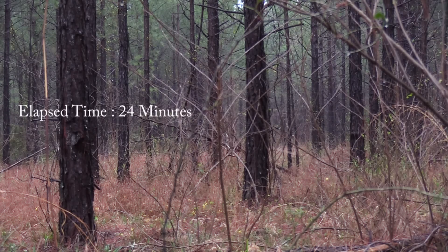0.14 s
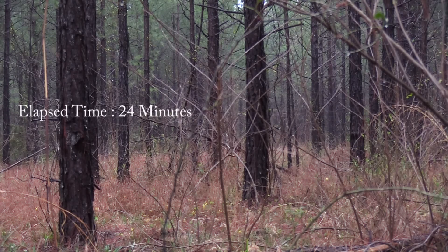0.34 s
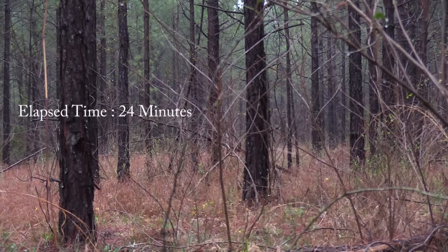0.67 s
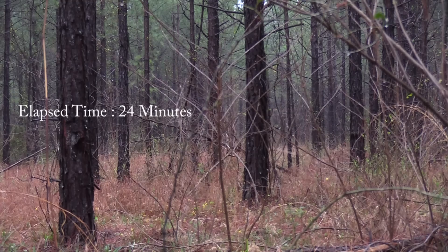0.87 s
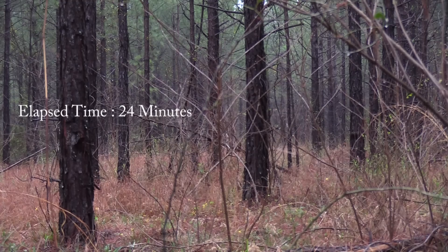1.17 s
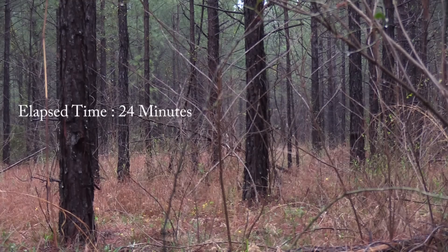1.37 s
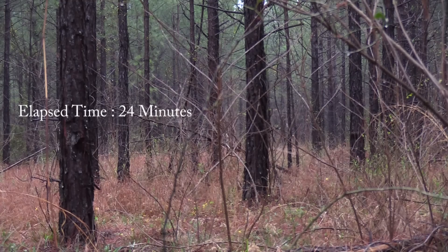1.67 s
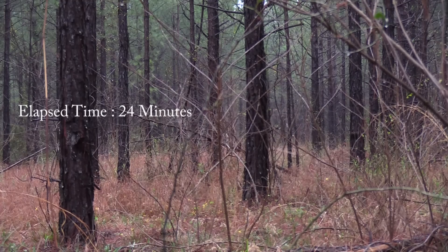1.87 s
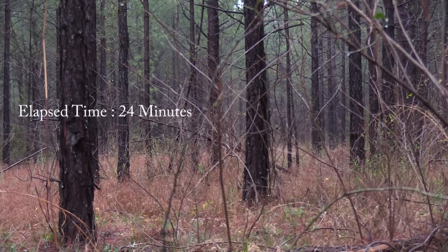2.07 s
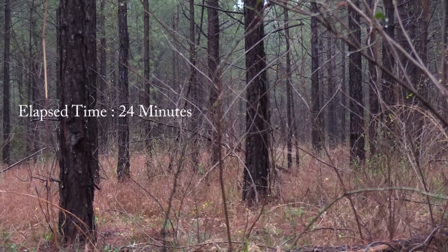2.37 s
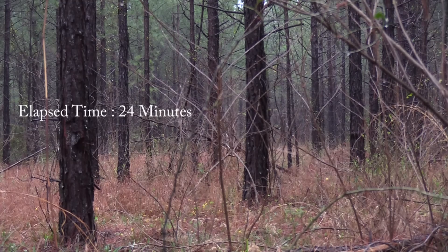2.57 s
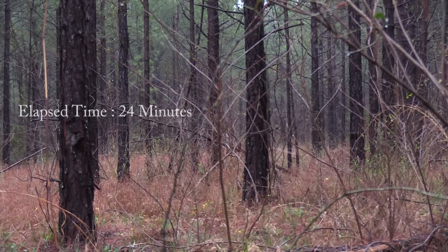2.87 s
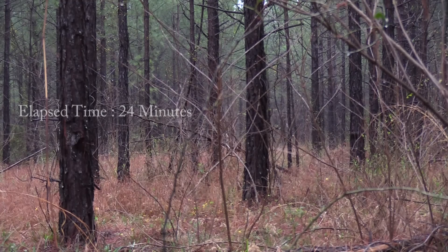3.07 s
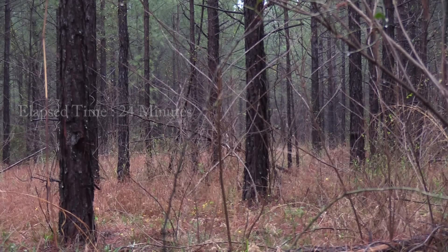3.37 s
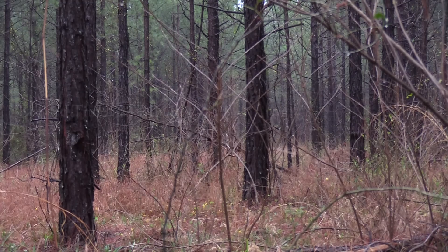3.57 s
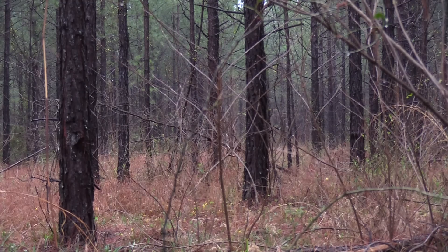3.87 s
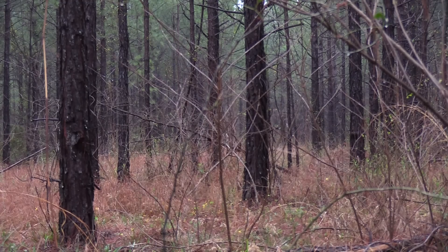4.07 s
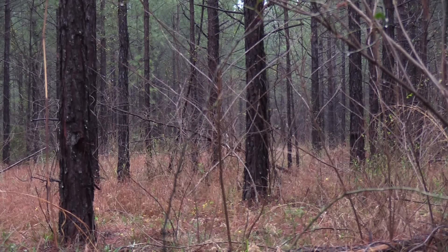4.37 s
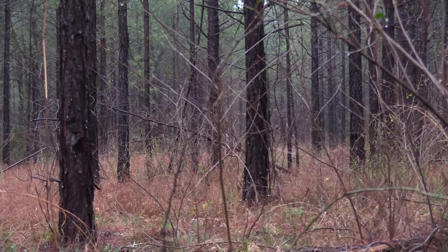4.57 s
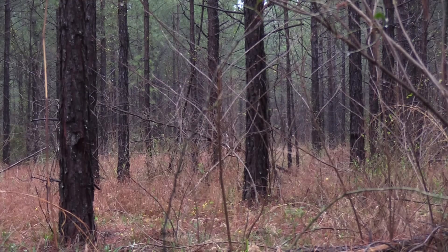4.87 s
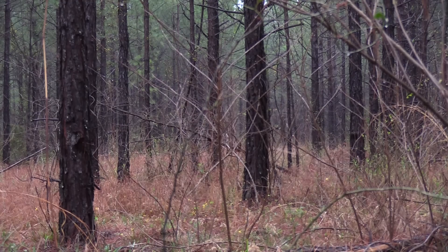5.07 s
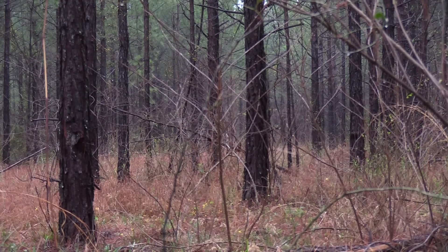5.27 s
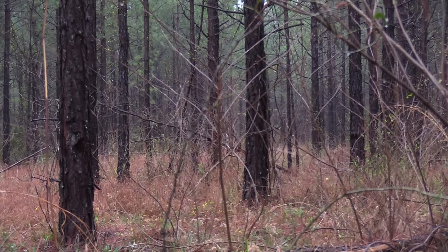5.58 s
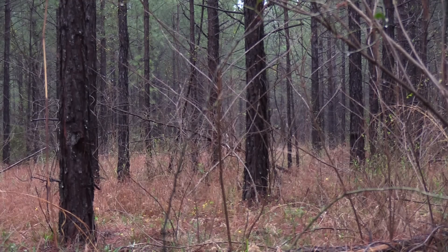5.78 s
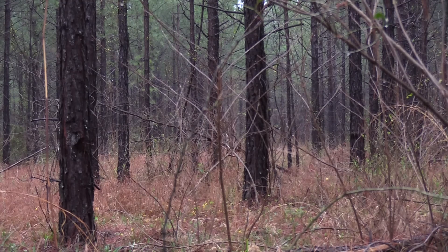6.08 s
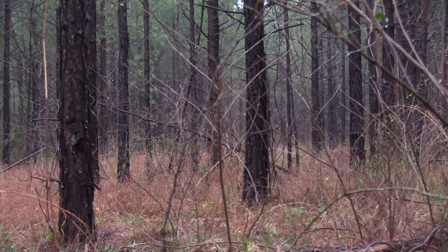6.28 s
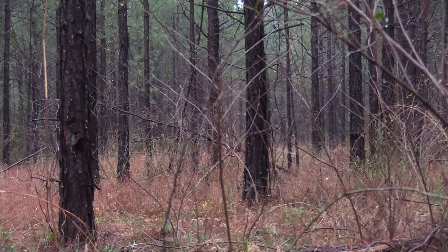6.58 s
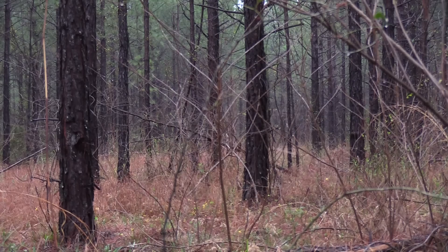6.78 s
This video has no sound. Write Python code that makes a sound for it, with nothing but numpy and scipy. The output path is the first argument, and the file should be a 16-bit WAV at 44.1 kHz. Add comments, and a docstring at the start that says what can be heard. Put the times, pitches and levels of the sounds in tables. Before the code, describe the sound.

A seven-second stereo ambience in still pine woods, with hand-held camera noise close by. A steady motor hum near 120 hertz, low rumble and thin wide hiss run throughout. From 0.5 seconds, soft deep double thumps through the grip repeat every two thirds of a second. A faint far bird gives a hoarse, noisy call gliding up toward 3.3 kilohertz, strongest around 0.4 to 0.9 and fading soon after. Dry twig ticks come at 1.3 and 1.8; faint thin calls at 2.4 and 3.4. At 4.3 a turkey makes one deep chest pulse, with small scuffs. From 4.6 its pulses near 65 hertz quicken from about twelve to nearly forty per second, merging into a throbbing boom ending around 6.2. Light rustle grows from 4.4, with tiny high squeaks from 4.9 to 6.4 and a low pressure shift near 5.7 to 6.1. Hum, rumble and softer rustle remain.

```python
"""Turkey drumming in pine woods

A wild turkey drums in still pine woods: after one short pulse, quickening chest pulses boom near 65 Hz,
made of overtones passing through a fixed resonance. A far bird gives a hoarse rising call, a gliding
noise-torn tone; two faint far calls (blurred sines) and dry twig ticks follow. A hand-held camera adds
motor hum (sines), rumble and hiss (shaped noise), a slow thump through the grip (struck resonances), and,
as it turns, faint squeaks (blurred sines) and rustle (noise).
"""
import sys
import numpy as np
from scipy import signal
from scipy.fft import rfft, irfft
from scipy.io import wavfile
from scipy.ndimage import uniform_filter1d

SR = 44100
rng = np.random.default_rng(int(sys.argv[2]) if len(sys.argv) > 2 else 0)


def digitize_waveform(pressure):
    """Quantize a signal to 16-bit integers and store it at the path in sys.argv[1].

    Rows of a 2-D input are taken as channels; values are limited to [-1, 1].
    """
    field = np.atleast_2d(pressure).T
    bounded = np.clip(field, -1, 1)
    quanta = np.round(bounded * 32767).astype(np.int16)
    wavfile.write(sys.argv[1], SR, quanta)


def ratio_of_db(decibels):
    """Turn decibels (scalar or array-like) into linear amplitude factors; 0 dB maps to 1."""
    return 10 ** (np.asarray(decibels, float) / 20)


N = 306230
TIME = np.arange(N) / SR

# The drum roll: (time [s], pulse rate [1/s], boom level [dB rms])
DRUM_ROLL = [(4.6, 12.2, -54), (4.66, 12.7, -38), (4.77, 13.8, -30), (4.92, 15, -30), (5.1, 17.2, -27),
             (5.2, 18, -32), (5.35, 21, -28.5), (5.5, 23.2, -28), (5.7, 24.7, -37.5), (5.8, 26.9, -32),
             (5.92, 29.5, -32.5), (6.1, 37, -25), (6.17, 33.6, -36), (6.25, 44, -60)]
# Strength of each thump through the grip, evenly paced: (level [dB])
THUMP_STRENGTHS = [-27.5, -30, -29, -26, -30, -41, -31, -29, -30.5, -28]
# Resonances of the held camera: (frequency [Hz], level [dB], t60 [s], delay [s])
GRIP_MODES = [(30.1, -0.5, 0.78, 0.0038), (10.4, -10, 1.9, 0.043)]
# Faint thin notes: two soft far calls near 1.9 and 1.3 kHz, then short squeaks:
# (time [s], length [s], start pitch [Hz], end pitch [Hz], level [dB rms])
THIN_NOTES = [(2.445, 0.24, 1905, 1876, -69.5), (3.38, 0.27, 1340, 1344, -69),
              (4.856, 0.13, 1950, 1970, -65), (4.87, 0.26, 2160, 2140, -68.5),
              (5.182, .28, 2450, 2320, -61.5), (5.202, 0.3, 3200, 3060, -62),
              (5.211, 0.046, 4900, 4810, -64), (5.29, .08, 5530, 5500, -66), (5.52, 0.096, 2160, 2170, -66),
              (5.67, .05, 2147, 2150, -65), (5.863, 0.0565, 2970, 2670, -57),
              (5.925, 0.032, 2990, 2960, -61), (6.07, .06, 3030, 2850, -57), (6.06, .16, 2620, 2580, -64),
              (6.08, 0.17, 3477, 3465, -65.5), (6.385, 0.032, 2800, 2800, -64)]
# Pitchless scuffs: (time [s], length [s], centre [Hz], level [dB rms], blur [Hz])
SCUFF_NOTES = [(4.227, 0.026, 2500, -58, 350), (4.228, .03, 4900, -63, 350), (4.27, .03, 2610, -65, 150),
               (4.53, .07, 2210, -62, 250), (6.5, 0.42, 4850, -67, 600)]
# Dry twig ticks: (time [s], frequency [Hz], starting level [dB])
TWIG_TICKS = [(1.345, 1600, -37), (1.81, 2300, -46)]
# Rustle while the camera turns: (time [s], bright hiss level [dB], duller rub level [dB])
RUSTLE_LEVELS = [(4.1, -77, -80), (4.36, -75, -76), (4.42, -64, -71), (4.62, -64, -70), (4.72, -56.5, -62),
                 (4.9, -61.5, -62), (5.4, -62.5, -61.5), (6.1, -62, -61.5), (6.5, -68, -65),
                 (6.94, -67, -69)]
# Steady motor tones: (frequency [Hz], level [dB rms], pitch waver [Hz])
MOTOR_TONES = [(119.8, -34.5, 0.31), (202.9, -48.5, 0.86), (238.8, -46, .3), (343.6, -56.5, 5.03),
               (503.8, -65.5, 1.16)]
# Rumble and hiss common to both microphone ports: (frequency [Hz], density [dB per Hz])
RUMBLE_SPECTRUM = [(8, -50.5), (20, -59.5), (45, -59.5), (80, -60.5), (105, -56.5), (140, -57.5),
                   (160, -64.5), (200, -62.5), (225, -68.5), (270, -62.5), (315, -77), (345, -68.5),
                   (390, -81), (480, -83), (680, -78), (850, -88.5), (1300, -90.5), (2000, -95.5),
                   (4000, -97.5), (8000, -99), (13000, -100), (15500, -105)]
# Hiss of opposite sign at the two ports: (frequency [Hz], density [dB per Hz])
HISS_SPECTRUM = [(20, -100), (60, -108), (150, -112), (300, -100), (500, -95.5), (1000, -99), (2000, -101),
                 (4000, -100), (8000, -101), (13000, -101), (15500, -105)]


def coloured(spectrum):
    """White noise shaped to a spectrum in dB per Hz, falling steeply below its first frequency."""
    hz, db = np.transpose(spectrum)
    bins = np.maximum(np.fft.rfftfreq(N, 1 / SR), 1)
    gain = ratio_of_db(np.interp(np.log(bins), np.log(hz), db))
    gain = gain * np.minimum(bins / hz[0], 1) ** 4
    return irfft(rfft(rng.standard_normal(N)) * gain, N) * np.sqrt(SR / 2)


def drift(hz, size):
    """Slow random motion: noise twice through a one-pole low-pass, with a spread of 1."""
    r = np.exp(-2 * np.pi * hz / SR)
    slow = signal.lfilter([1], [1, -2 * r, r * r], rng.standard_normal(size + SR))[SR:]
    return slow / np.sqrt((1 + r * r) / (1 - r * r) ** 3)


def drum():
    """The pulse train quickens, so ever lower overtones climb through the fixed chest resonance."""
    chest_hz, below_width_hz, above_width_hz = 69.5, 12.5, 6.5
    first_s, first_db, first_width_s = 4.265, -32.5, 0.055
    s, per_s, boom_db = np.transpose(DRUM_ROLL)
    rate = np.interp(TIME, s, per_s)
    turns = np.cumsum(rate) / SR
    turns = turns - turns[int(first_s * SR)]  # the lone first pulse falls on its level peak
    order = np.arange(1, 9)[:, None]
    off = order * rate - chest_hz
    width = np.where(off > 0, above_width_hz, below_width_hz)  # steeper above than below
    chest = np.exp(-(off / width) ** 2)
    boom = (chest * np.cos(2 * np.pi * order * turns)).sum(axis=0)
    evened = boom / np.sqrt((chest ** 2).sum(axis=0) / 2)
    first = ratio_of_db(first_db) * np.exp(-((TIME - first_s) / first_width_s) ** 2)
    roll = ratio_of_db(np.interp(TIME, s, boom_db, left=-120, right=-120))
    return (first + roll) * evened


def call():
    """A gliding tone and its lower octave, both torn into a narrow noise by an unsteady throat."""
    top_hz, top_s, arch_hz_per_s2 = 3355, 1.1, 400
    width_hz, lower_db = 154, -9.5
    full_db, full_s, fades_s = -56.5, 0.43, 0.87
    swell_db_per_s, fade_db_per_s = 20, 33
    pitch = np.maximum(top_hz - arch_hz_per_s2 * (TIME - top_s) ** 2, 0)
    phase = 2 * np.pi * np.cumsum(pitch) / SR

    def torn(angle):
        """Two drifting waves a quarter turn apart make a narrow band of noise."""
        return drift(width_hz, N) * np.sin(angle) + drift(width_hz, N) * np.cos(angle)

    voice = torn(phase) + ratio_of_db(lower_db) * torn(phase / 2)
    level = full_db - swell_db_per_s * np.maximum(full_s - TIME, 0)
    level = level - fade_db_per_s * np.maximum(TIME - fades_s, 0)
    return ratio_of_db(level + 1.5 * drift(40, N)) * voice


def thumps(second_s=0.129, second_db=-6, soft_hz=40):
    """A strong and a weak soft push, about ninety pairs a minute, shake the held camera."""
    first_s, every_s = 0.475, 0.6675
    times = first_s + every_s * np.arange(len(THUMP_STRENGTHS))
    out = np.zeros(N)
    for hz, mode_db, t60, delay in GRIP_MODES:
        push = np.full(N, 1e-18)  # a trace of offset keeps the filter fast
        for s, db in zip(times, THUMP_STRENGTHS):
            push[int((s + delay) * SR)] += ratio_of_db(db + mode_db)
            push[int((s + delay + second_s) * SR)] += ratio_of_db(db + mode_db + second_db)
        r, w = ratio_of_db(-60 / (t60 * SR)), 2 * np.pi * hz / SR
        out += signal.lfilter([0, np.sin(w)], [1, -2 * r * np.cos(w), r * r], push)
    return signal.lfilter(*signal.butter(1, soft_hz, fs=SR), out)


def thin_notes_and_scuffs(clean=0.95, note_blur_hz=35):
    """Far calls, stick-slip squeaks and scuffs: a sine blurred by noise under a rounded envelope."""
    out = np.zeros(N)
    notes = [(*row, note_blur_hz) for row in THIN_NOTES]
    notes += [(s, length, hz, hz, db, blur) for s, length, hz, db, blur in SCUFF_NOTES]
    for s, length, from_hz, to_hz, db, blur_hz in notes:
        at, size = int(s * SR), int(length * SR)
        wander = drift(blur_hz, SR // 2) + 1j * drift(blur_hz, SR // 2)
        blur = clean * np.exp(-blur_hz / 150) + 0.5 * wander[:size]  # wide blur leaves less pure tone
        blur = blur * np.sqrt(2 / np.mean(np.abs(blur) ** 2))
        tone = np.exp(2j * np.pi * np.cumsum(np.linspace(from_hz, to_hz, size)) / SR)
        out[at:at + size] += ratio_of_db(db) * (blur * tone).real * signal.windows.tukey(size, 0.3)
    return out


def ticks(t60=0.006):
    """Twig ticks: one click each into a resonance that dies quickly."""
    out = np.zeros(N)
    for s, hz, db in TWIG_TICKS:
        age = np.maximum(TIME - s, 0)
        out += ratio_of_db(db - 60 * age / t60) * np.sin(2 * np.pi * hz * age)
    return out


def smear(x, t60=0.058, wet_db=-6):
    """Close scattered echoes: noise that dies away."""
    t = TIME[:SR // 4]
    tail = rng.standard_normal(len(t)) * ratio_of_db(-60 * t / t60)
    tail = tail / np.sqrt((tail ** 2).sum())
    return x + ratio_of_db(wet_db) * signal.fftconvolve(x, tail)[:N]


def rustle(flicker_db=1.5):
    """Cloth and strap rub: flickering bright noise, partly different at each port, and a duller part."""
    s, hiss_db, rub_db = np.transpose(RUSTLE_LEVELS)
    noise = rng.standard_normal(N) + 0.22 * rng.standard_normal((2, N))
    bright = signal.lfilter(*signal.butter(1, [3430, 11000], "band", fs=SR), noise)
    rub = signal.lfilter(*signal.butter(2, [1740, 4100], "band", fs=SR), noise[0])
    flicker = ratio_of_db(flicker_db * drift(17, N))
    bright_level = ratio_of_db(np.interp(TIME, s, hiss_db, left=-120))
    rub_level = ratio_of_db(np.interp(TIME, s, rub_db, left=-120))
    return flicker * (bright_level * bright / bright.std() + rub_level * rub / rub.std())


def lean():
    """A slow one-sided shift of pressure with rounded corners."""
    start_s, rise_s, back_s, fall_s, creep_end_s = 5.72, 0.14, 6.08, 0.056, 7.2
    pressure, creep_pressure = 0.067, 0.022
    s = [start_s, start_s + rise_s, back_s, back_s + fall_s, creep_end_s]
    corners = [0, pressure, pressure, creep_pressure, 0]
    return uniform_filter1d(np.interp(TIME, s, corners), size=1500)


def hum():
    """Motor hum: sines that each wander in pitch by their own small amount."""
    out = np.zeros(N)
    for hz, db, waver_hz in MOTOR_TONES:
        pitch = hz + waver_hz * drift(3.055, N)
        out += ratio_of_db(db) * np.sqrt(2) * np.sin(2 * np.pi * np.cumsum(pitch) / SR)
    return out


def rumble():
    """Low-heavy noise with some hiss on top, alike at both ports."""
    return coloured(RUMBLE_SPECTRUM)


def hiss():
    """One noise sent to the two ports with opposite sign, which spreads it wide."""
    return coloured(HISS_SPECTRUM) * [[1], [-1]]


def scene():
    """Everything but the wide hiss and part of the rustle is alike at both ports."""
    main_birds = drum() + call()
    echoed = smear(thin_notes_and_scuffs() + ticks())
    shared = main_birds + thumps() + echoed + lean() + hum() + rumble()
    return shared + rustle() + hiss()


def top_cut(x):
    """Nothing passes above the cut-off."""
    return signal.sosfilt(signal.butter(12, 15670, fs=SR, output="sos"), x)


def record(dry):
    """Takes the mix of both ports as it stands, with no further filter or gain."""
    return top_cut(dry)


dry = scene()
out = record(dry)
digitize_waveform(out)
```